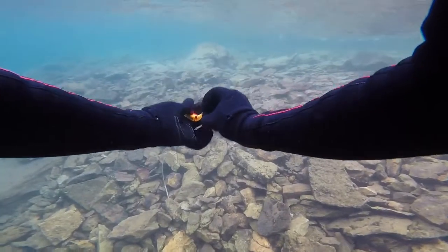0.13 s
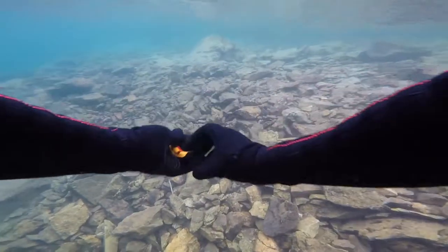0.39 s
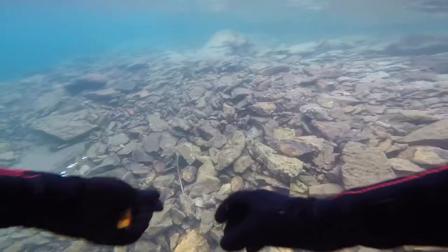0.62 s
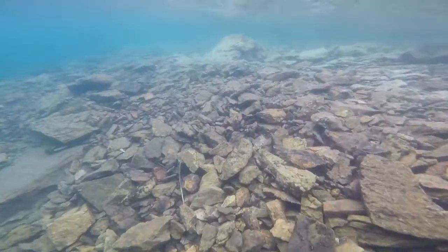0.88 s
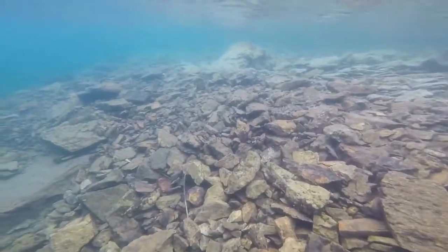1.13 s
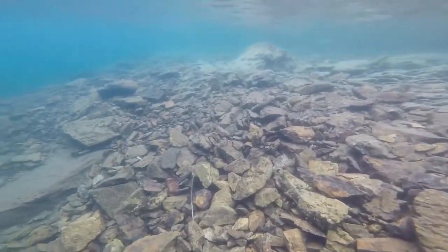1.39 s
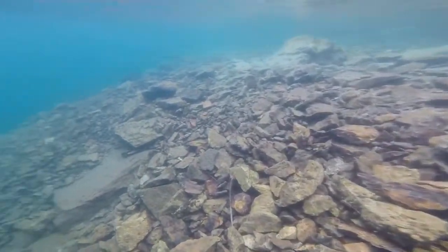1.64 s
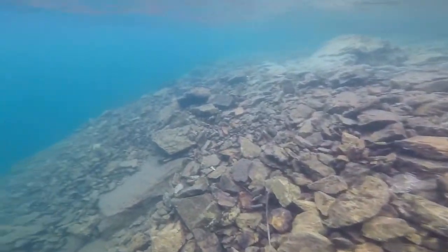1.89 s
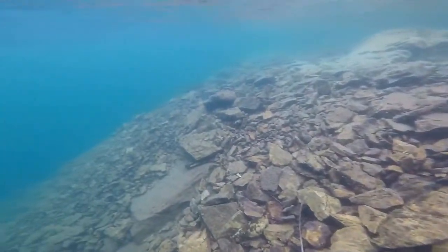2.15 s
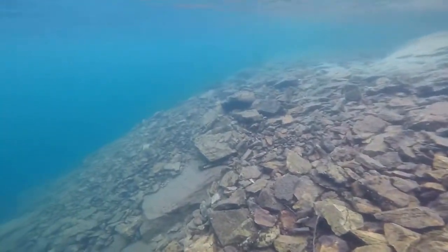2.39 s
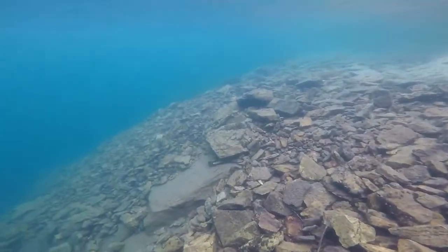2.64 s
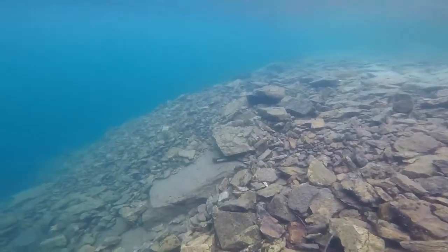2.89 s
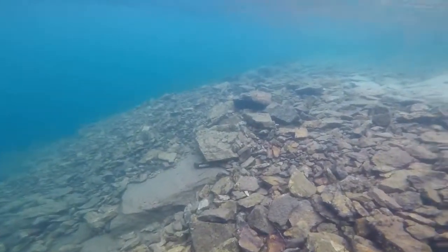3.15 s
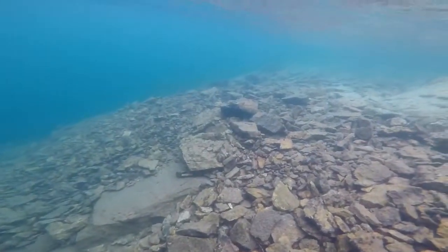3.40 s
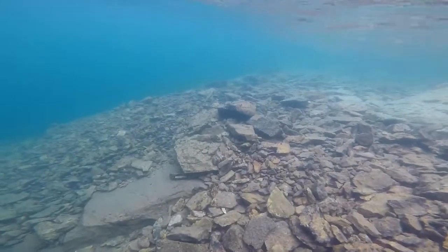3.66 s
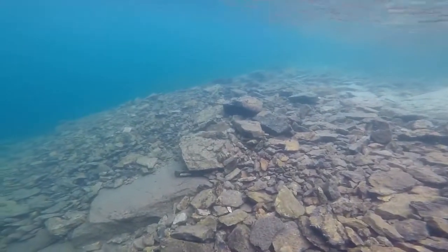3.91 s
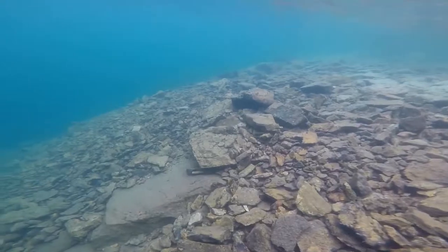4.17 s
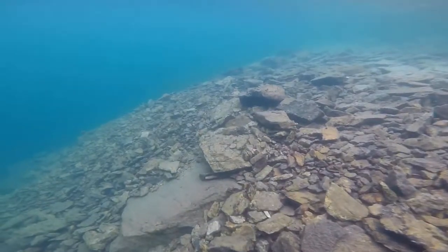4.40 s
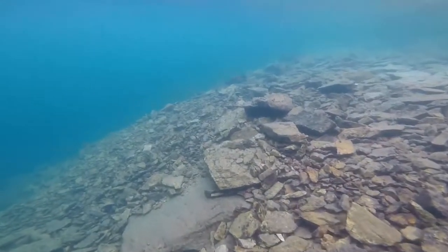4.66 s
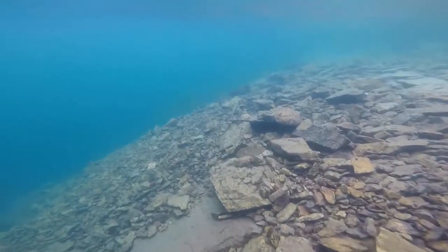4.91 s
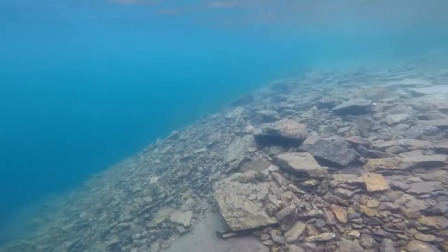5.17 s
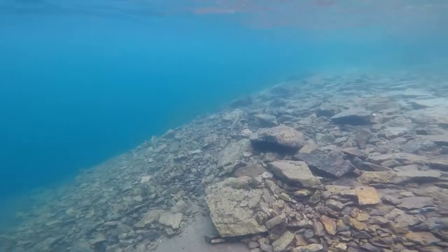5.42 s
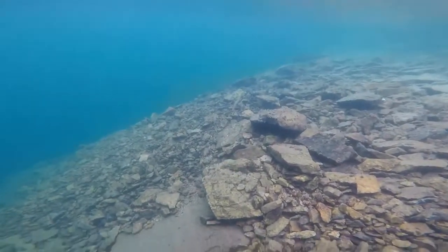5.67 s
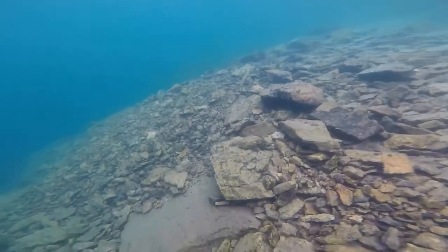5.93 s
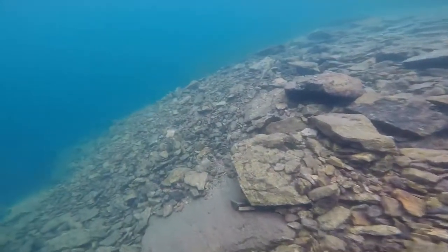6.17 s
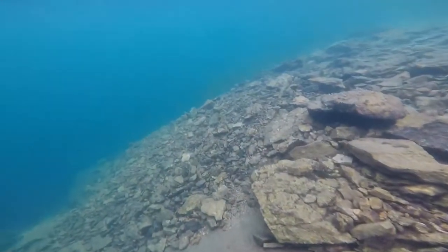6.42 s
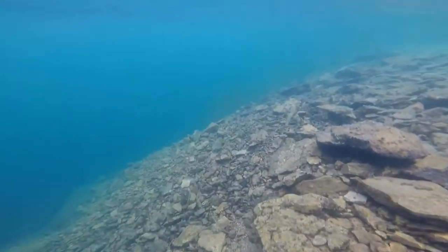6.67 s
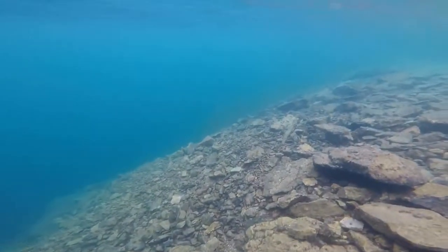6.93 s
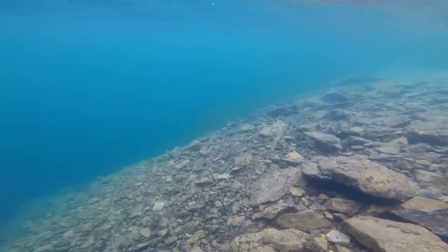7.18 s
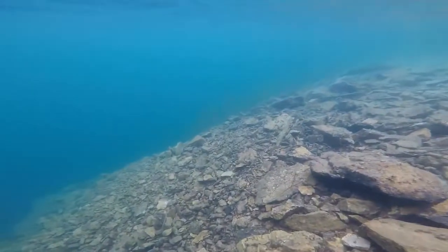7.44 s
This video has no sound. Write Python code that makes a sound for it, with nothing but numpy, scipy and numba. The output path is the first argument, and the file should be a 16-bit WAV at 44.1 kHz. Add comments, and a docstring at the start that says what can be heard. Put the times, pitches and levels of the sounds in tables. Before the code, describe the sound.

Close, muffled water sound from a sealed camera on a swimmer's head, just under a lake's surface. From the start water gurgles and rumbles past with a hollow swish, over soft microphone hiss and a very faint thin whistle gone by 0.5 s. Small bubbles blip and gurgle in a cluster from 0.35 to 1 s, and a low surge peaks about 0.95. Between 1.5 and 2.5 come deep glugs, bright single bloops, a sharper knock near 1.95 and another surge near 2.15. At 2.75 a hard knock meets a splashy rush of bubbles; strong thuds follow around 3.2. From 4.2 to 4.9 knocks and bloops crowd together, the level dipping after the hardest. Gurgling swells around 5.5, with a knock; swish rises near 6, light shell ticks at 5.8 and 6.1, knocks at 6.25 and 6.55. Glugs and bubbles continue to 7.5.

```python
"""Water surges and gurgles past at once, close against a camera sealed in a housing on a swimmer's head,
just under a lake's surface. Bubbles are swelling and dying tones; crowds of them make the streaming water,
swishing through the housing's ring near 1 kHz. Air pockets glug, and knocks of the mount and ticks on the
shell ring fixed modes. Two microphone ports add hissing noise, and a gain control ducks everything,
the hiss too, after the hardest knocks."""
import sys
import numpy as np
from scipy import signal
from scipy.fft import rfft, irfft
from scipy.io import wavfile
from scipy.ndimage import uniform_filter1d, minimum_filter1d
from numba import njit

SR = 44100
rng = np.random.default_rng(int(sys.argv[2]) if len(sys.argv) > 2 else 0)


def invert_db(x):
    """Field ratio 10**(x/20) for x, a level in decibels (scalar or array-like)."""
    u = np.asarray(x, float) / 20
    return 10 ** u


def output_pcm(signal):
    """Save a mono or channel-first signal as 16-bit PCM at the path in sys.argv[1].

    Samples are clipped to [-1, 1] before scaling.
    """
    pcm = np.clip(np.atleast_2d(signal).T, -1, 1) * 32767
    wavfile.write(sys.argv[1], SR, np.round(pcm).astype(np.int16))


N = 333396  # samples


def along_hz(table):
    """Columns of a table spread over the spectrum's bins, straight along log frequency."""
    hz, *columns = np.transpose(table)
    bins = np.log(np.maximum(np.fft.rfftfreq(N, 1 / SR), 1))
    return [np.interp(bins, np.log(hz), column) for column in columns]


def shaped(x, gain):
    """Filter by a gain for each bin."""
    return irfft(rfft(x) * gain, N)


def steps(per_s):
    """Random levels of unit scatter, held briefly and slewed."""
    hold = int(SR / per_s)
    held = np.repeat(rng.standard_normal(int(30 * N / SR)), hold)[:N]
    return uniform_filter1d(held, size=hold // 2)


@njit
def ring(n, rate, at, size, hz, rise, bend, fall):
    """Tones that swell for `rise` seconds to their peak at `at`, then die away, the pitch bending as they go."""
    out = np.zeros(n)
    for k in range(len(at)):
        start, phase = int((at[k] - rise[k]) * rate), 0.
        for i in range(max(0, -start), min(int(11 * rise[k] * rate), n - start)):
            age = i / (rise[k] * rate)  # 1 at the peak
            late = age + (fall - 1) * max(age - 1, 0.)
            # the bend goes from `bend` octaves below the pitch to as far above it
            phase += 2 * np.pi * hz[k] * 2 ** (bend[k] * (min(age, 2.) - 1)) / rate
            out[start + i] += size[k] * late * np.exp(1 - late) * np.sin(phase)
    return out


BIGGEST = 3.5  # largest bubble, in size scatters above the smallest


def cloud(low_hz, high_hz, per_s, cycles, scatter_db, rise_octaves, fall=0.42):
    """Many bubbles of chance time, size and pitch, together at unit loudness."""
    when, pitch, bigness = rng.random((3, int(per_s * N / SR)))
    hz = low_hz * (high_hz / low_hz) ** pitch
    size = invert_db(scatter_db * np.minimum(-np.log(1 - bigness), BIGGEST))
    x = ring(N, 1. * SR, when * N / SR, size, hz, cycles / hz / 2, rise_octaves + 0 * hz, fall)
    return x / np.std(x)


def passing(start_s, stop_s, db, kind):
    """A bubble cloud that fades in fast, holds and fades out more slowly."""
    attack_s, release_s = 0.022, 0.18
    corners_s = [start_s, start_s + attack_s, stop_s, stop_s + release_s]
    return invert_db(db) * np.interp(np.arange(N) / SR, corners_s, [0, 1, 1, 0]) * cloud(*kind)


# The water streaming past the housing, at the near port before flutter and housing tilt. Each row: time in
# seconds, then levels in dB of the surge, the gurgle, the swish and the fizz.
FLOW = [(0, -25, -16, -24, -46), (0.249, -15.5, -20, -25.5, -51.5), (0.598, -19.5, -20, -24, -45),
        (.8, -17, -15, -25, -44), (.96, -10.5, -15, -20.5, -46), (1.1, -17.5, -18, -21.5, -50.5),
        (1.219, -27.5, -23, -27.5, -49.5), (1.36, -24, -21, -25, -50), (1.39, -22, -19.5, -18.5, -44),
        (1.5, -18, -16.5, -21, -45.5), (1.848, -24.5, -19, -19.5, -53), (2.159, -13, -16, -20.5, -49.5),
        (2.502, -34.5, -23.5, -22.5, -48), (2.72, -29, -17.5, -22, -48.5), (2.75, -21, -17.5, -17, -49.5),
        (2.85, -18, -21.5, -16, -44.5), (2.968, -23, -21, -20.5, -44.5), (3.1, -15.5, -17, -17, -47.5),
        (3.237, -19, -18, -16, -44), (3.261, -11.5, -19, -21, -47), (3.361, -20, -17, -20.5, -47.5),
        (3.501, -18.5, -17.5, -20.5, -45.5), (3.65, -17, -23, -14, -45.5),
        (3.849, -23.5, -18.5, -18.5, -41.5), (4.02, -27, -19, -23, -48), (4.19, -15, -24.5, -17, -40),
        (4.22, -21, -20.5, -21.5, -49.5), (4.45, -25, -21.5, -21, -47.5), (4.65, -22.5, -17.5, -19.5, -54),
        (4.8, -16.5, -16.5, -24.5, -48.5), (5.15, -17, -19, -19.5, -43.5), (5.501, -21, -14.5, -20, -45),
        (5.95, -20.5, -19.5, -14.5, -44.5), (6.301, -17, -15, -21, -48.5), (6.55, -25, -22, -23, -51),
        (6.8, -18.5, -17.5, -21.5, -49.5), (7.0, -22, -19, -24, -48), (7.14, -21.5, -18.5, -18.5, -51),
        (7.299, -24.5, -13, -21.5, -46), (7.56, -24.5, -20, -20, -50)]
# Sloshes over a steady lapping. Each row: loudest moment in seconds, level in dB, length in seconds.
SLOSHES = [(0.353, -24.5, 0.045), (0.734, -27.5, 0.14), (1.075, -35, 0.07), (2.087, -28.5, 0.1),
           (2.76, -18.5, 0.035), (2.792, -29.5, 0.013), (2.866, -27, 0.071), (3.068, -27.5, 0.17),
           (3.234, -21, 0.048), (3.513, -30.5, 0.16), (4.202, -19, 0.034), (4.371, -27, 0.026),
           (4.683, -29.5, 0.18), (5.153, -27.5, 0.044), (5.379, -27.5, 0.063), (5.648, -27, 0.15),
           (6.002, -18, 0.064), (6.236, -28.5, 0.09), (6.826, -40.5, 0.23)]
LAPPING_DB = -30
# flutter shared by all clouds, and a wander of each: changes a second, scatter in dB before slewing
FLUTTER_PER_S, FLUTTER_DB = 14, 1.4
WANDER_PER_S, WANDER_DB = 18, [1.5, 1.2, 1.3, 1.5, 1]  # surge, gurgle, slosh, swish, fizz


def cloud_levels():
    """Gain of each cloud: the flow or the sloshes, a wander of its own and a flutter shared by all."""
    t = np.arange(N) / SR
    s, *columns = np.transpose(FLOW)
    surge, gurgle, swish, fizz = (invert_db(np.interp(t, s, column)) for column in columns)
    slosh = invert_db(LAPPING_DB)
    for at, db, length in SLOSHES:
        slosh = slosh + invert_db(db) * np.exp(-((t - at) / length) ** 2)
    shared_db = FLUTTER_DB * steps(FLUTTER_PER_S)
    sources = zip([surge, gurgle, slosh, swish, fizz], WANDER_DB)
    return [gain * invert_db(shared_db + db * steps(WANDER_PER_S)) for gain, db in sources]


# Bubble clouds of the water: surge, gurgle, slosh, swish, fizz. Each row: lowest pitch in Hz, highest in Hz,
# bubbles a second, cycles in twice the swelling time, size scatter in dB, pitch rise up to the peak in octaves.
CLOUDS = [(25.1, 75, 65, 1.58, 0.5, 0.091), (73.9, 267.7, 250, 2.376, 2, 0.18),
          (260.3, 677, 500, 2.93, 4.5, 0.1), (615.8, 1474.6, 850, 8.87, 3.5, 0.094),
          (1280, 3200, 2500, 4, 6, 0.16)]
# Tilt that the sealed housing gives the bubble clouds. Each row: frequency in Hz, gain in dB.
HOUSING = [(12, 6), (24, -9.5), (42, 3), (75, -4), (120, 1.5), (200, 1), (270, -4.5), (320, -6), (400, 0),
           (520, -4), (700, -6.5), (880, 6), (1050, 1), (1250, -4), (1500, -12.5), (1700, 1), (2100, -3.5),
           (2600, -14.5), (3400, -15.5), (4500, -9.5)]
# sparse crackle riding on the fizz: columns as in CLOUDS, and its dB against the fizz
CRACKLE, CRACKLE_DB = (1200, 4000, 350, 4, 3, .03), -6
# pace of dying away against swelling, for each cloud: surge and gurgle drop off fast
CLOUD_FALLS = [2.5, 2.5, 1., 1., 1.]


def water(levels):
    """Five sizes of bubble cloud, a crackle, a cluster and a passing stream, heard through the housing."""
    clouds = sum(gain * cloud(*row, fall) for gain, row, fall in zip(levels, CLOUDS, CLOUD_FALLS))
    clouds = clouds + invert_db(CRACKLE_DB) * levels[-1] * cloud(*CRACKLE)
    clouds = clouds + cluster() + stream()
    return shaped(clouds, invert_db(along_hz(HOUSING)[0]))


# A thin whistle. One row: centre in Hz, half width in Hz, level in dB, fading from and gone at, in seconds.
WHISTLE = (3300, 200, -64, .15, .45)


def whistle():
    """A narrow band of noise, dying out in the first half second."""
    hz, width, db, fading_s, gone_s = WHISTLE
    band = shaped(rng.standard_normal(N), np.exp(-((np.fft.rfftfreq(N, 1 / SR) - hz) / width) ** 2))
    fade = np.interp(np.arange(N) / SR, [fading_s, gone_s], [1, 0])
    return invert_db(db) * band / np.std(band) * fade


# Hiss of the two microphones before its swell. Each row: frequency in Hz, left gain in dB, right gain in dB.
HISS = [(1500, -67, -54.5), (3460, -53.5, -56.5), (4670, -62, -55.5), (6000, -57.5, -58), (9300, -62, -57),
        (10160, -60.5, -58.5), (12500, -70, -67.5), (13670, -83.5, -76)]
# Slow swell of the hiss. Each row: time in seconds, gain in dB.
HISS_SWELL = [(0, 3.5), (0.899, 0.9), (1.5, 2.5), (2.2, 1), (3.5, 0.5), (4.6, 1.4), (5.401, 3.5),
              (5.9, -0.4), (7.56, -0.2)]


def hiss():
    """White noise coloured for each microphone, swelling slowly and flickering alike on both."""
    flicker_db = 1.5 * steps(25)  # 25 changes a second
    swell = invert_db(np.interp(np.arange(N) / SR, *np.transpose(HISS_SWELL)) + flicker_db)
    return swell * np.array([shaped(rng.standard_normal(N), invert_db(db)) for db in along_hz(HISS)])


# Small bubbles heard singly at the near port. Each row: loudest moment in seconds, peak in dB, pitch in Hz.
BLIPS = [(.055, -20.5, 1337), (.056, -40, 2320), (.164, -10, 998), (.325, -28, 1420), (.358, -22, 495),
         (.394, -16, 764), (.411, -32, 1744), (.467, -24.5, 1366), (.47, -21, 605), (.535, -14.5, 1043),
         (.553, -47, 2300), (.568, -15.5, 940), (.582, -38, 2090), (.589, -18, 1390), (.621, -10.5, 1220),
         (.632, -39, 2220), (.693, -41, 1676), (.739, -14.5, 1090), (.806, -21, 1386), (.811, -36, 1900),
         (.846, -36, 2080), (.895, -13, 1124), (.957, -40, 1740), (.986, -16, 1120), (1.02, -9.5, 785),
         (1.028, -44, 2090), (1.097, -20, 596), (.81, -40.5, 2400), (.836, -14.5, 1257), (.855, -7.5, 935),
         (.915, -34, 1880), (.92, -21.5, 1194), (.96, -14, 1157), (.979, -42, 3220), (1.01, -44.5, 2430),
         (1.622, -15, 875), (1.657, -11, 1020), (1.748, -7, 984), (2.152, -8, 790), (1.955, -2, 1084),
         (2.384, -3.5, 910), (2.622, -46, 2870), (2.758, -12.5, 534), (2.876, -15, 1290), (4.06, -10, 1126),
         (4.119, -20, 1336), (4.19, -11.5, 797), (4.199, -6, 416), (4.247, -13.5, 1075), (4.6, -10, 1027),
         (4.293, -7, 922), (4.363, -12.5, 398), (4.666, -2, 913), (4.736, -19, 439), (4.886, -15.5, 615),
         (5.336, -21.5, 466), (5.56, -44.5, 3230), (5.638, -44, 3340), (5.644, -27, 1500),
         (5.683, -17.5, 1270), (5.954, -15, 680), (6.763, -9.5, 970), (6.829, -13.5, 828),
         (6.83, -20.5, 1230), (7.015, -12.5, 910), (7.131, -14.5, 1007), (7.392, -15, 805),
         (7.43, -11, 1094), (7.233, -26.5, 1600), (7.299, -12, 1275), (7.355, -22, 1406)]


def blips():
    """Small bubbles that all swell for the same number of cycles and die away at a slower pace."""
    s, db, hz = np.transpose(BLIPS)
    cycles_to_peak, rise_octaves, fall = 3.277, 0.029, 0.75
    return ring(N, 1. * SR, s, invert_db(db), hz, cycles_to_peak / hz, rise_octaves + 0 * s, fall)


# Large air pockets. Each row: loudest moment in seconds, peak in dB, pitch in Hz, length in ms.
GLUGS = [(0.371, -11, 46.3, 54), (0.784, -3, 221.7, 18), (1.134, -5, 157.3, 14), (1.515, -8.5, 115, 29.7),
         (1.843, -5, 109.6, 14), (1.881, -1, 123.8, 14), (2.12, -10.5, 127.3, 40), (2.338, -5, 139, 29),
         (2.489, -10.5, 57.2, 16), (2.74, -6.5, 71, 39), (2.901, -16.5, 265.4, 38), (3.244, -1.5, 56.4, 16),
         (3.411, -4.5, 111, 18.7), (4.411, -6, 130.4, 70), (4.529, -16, 145.2, 98), (4.876, -11, 144.2, 94),
         (5.492, -11.5, 101.8, 144.2), (5.556, -17.5, 112, 153), (5.787, -3.5, 107, 28.5),
         (6.452, -12, 227, 26), (6.808, -10.5, 100.2, 113), (6.868, -7, 151, 31), (7.205, -4.5, 120, 27.5)]


def glugs():
    """Air pockets as low tones of their own lengths, rising slightly in pitch."""
    s, db, hz, ms = np.transpose(GLUGS)
    swell_share, rise_octaves = 0.4047, 0.044  # share of the length spent swelling
    return ring(N, 1. * SR, s, invert_db(db), hz, swell_share * ms / 1000, rise_octaves + 0 * s, 1.)


def cluster():
    """A cluster of uneven bubbles gurgling up early on."""
    return passing(.35, 0.94, -40, (700, 2400, 240, 5, 4, 0.13))  # kind: columns as in CLOUDS


# What the mount rings with. Each row: frequency in Hz, level in dB, t60 in seconds.
MOUNT = [(290, 0.5, .04), (490, -1.5, .035), (700, -6, .03), (1100, -5, .018), (1600, -35, .015),
         (2000, -38, .014)]
# Knocks of the mount. Each row: start in seconds, level in dB, sharpness in dB per octave around 500 Hz,
# low modes at the right port against the left in dB.
KNOCKS = [(.352, -8, -2, 0), (1.077, -9, 0, 0), (1.375, -12, 3, 0), (1.634, -8, -4, 0), (1.732, -9, -4, 0),
          (1.952, -9, 7, 5), (2.733, -10, -4, 0), (2.746, -3, 2, 4), (3.207, -9, 1, 0), (3.229, 0, 1, 5),
          (3.318, -3, -9, 0), (3.744, -7, -5, 0), (3.857, -6, -6, 0), (4.188, -5, 1, 0),
          (4.229, 1, -3, -10), (4.406, -7, 2, -10), (4.564, -7, 0, -6), (4.645, -6, 1, -11),
          (4.812, -3, 1, -10), (4.905, -6, 3, -10), (5.574, -5, 4, 5), (6.228, -11, 2, 0),
          (6.259, -3, -7, 0), (6.548, -8, -3, 0)]
LOW_MODE_HZ = 600  # modes below it differ between the ports


def knocks():
    """Every knock rings the same modes; a sharper contact favours the high ones. Left and right."""
    out = np.zeros((2, N + SR))
    t = np.arange(SR // 10) / SR
    for s, db, sharp_db, right_db in KNOCKS:
        start = int(s * SR)
        for hz, mode_db, t60 in MOUNT:
            ports_db = np.array([[0], [right_db * (hz < LOW_MODE_HZ)]])
            size = invert_db(db + mode_db + sharp_db * np.log2(hz / 500) + ports_db)
            tone = np.sin(2 * np.pi * hz * (1 + .03 * rng.standard_normal()) * t)
            contact = (1 - np.exp(-2.5 * t * hz)) ** 3  # soft onset
            out[:, start:start + len(t)] += size * tone * contact * np.exp(-np.log(1000) * t / t60)
    return out[:, :N]


# What the housing's shell rings with when ticked. Each row: frequency in Hz, level in dB, t60 in seconds.
SHELL = [(1650, -2, .012), (2050, 3, .012), (2500, 1, .01), (3200, -3, .008), (3750, 0, .007),
         (4600, -3, .005), (5600, -3, .004), (7200, -1, .003), (9000, 0, .003), (11000, 0, .003)]
# Light hard ticks on the shell. Each row: start in seconds, level in dB, strongest near this Hz,
# falling off from there in dB per octave, right port against left in dB.
TICKS = [(.470, -44, 4600, 7, 0), (1.377, -54, 5600, 12, 3), (1.396, -51, 4200, 14, 6),
         (1.952, -33, 4200, 3, -22), (2.235, -47, 3400, 20, -2), (2.825, -55, 9000, 9, 20),
         (2.965, -34, 3000, 17, -3), (3.744, -35, 3500, 22, -3), (4.178, -56, 5600, 5, 3),
         (4.707, -62, 11000, 14, 20), (5.827, -28, 2350, 15, -1), (6.138, -23, 1900, 36, 1),
         (6.139, -32, 3750, 15, -2), (6.381, -56, 5800, 14, 9), (7.401, -45, 3200, 22, -2)]


def ticks():
    """A tick rings the shell's modes near its own pitch. Left and right."""
    out = np.zeros((2, N))
    t = np.arange(SR // 50) / SR
    hz, mode_db, t60 = np.transpose(SHELL)[:, :, None]
    for s, db, centre_hz, fall_db, right_db in TICKS:
        start = int(s * SR)
        size = invert_db(db + mode_db - fall_db * np.abs(np.log2(hz / centre_hz)))
        tone = np.sin(2 * np.pi * hz * (1 + .03 * rng.standard_normal(hz.shape)) * t)
        contact = (1 - np.exp(-t * hz)) ** 2
        ringing = np.sum(size * tone * contact * np.exp(-np.log(1000) * t / t60), axis=0)
        out[:, start:start + len(t)] += invert_db(np.array([[0], [right_db]])) * ringing
    return out


def stream():
    """A stream of like-sized bubbles rushing past."""
    return passing(2.77, 3.01, -20, (1200, 1420, 480, 12, 3.3, 0.078))  # kind: columns as in CLOUDS


# Right port against left. Each row: frequency in Hz, level in dB, phase lead in radians,
# share of the water heard by both ports from 0 to 1.
PORTS = [(30, 0, -.1, .8), (60, 0, -.2, .72), (110, -1.2, -.15, .92), (200, -4, .1, .85),
         (300, -3, 1.8, .4), (400, -2.2, 2.6, .6), (520, 3, 3.5, .6), (650, 1.5, 3.75, .92),
         (900, -2.4, 3.1, .98), (1400, -1.2, 2.2, .94), (2500, -.6, 1.3, .7), (3200, -2.5, -.1, .7)]


def scene():
    """The right port hears the housing's ring nearly upside down, and some eddies of its own."""
    level_db, lead, share = along_hz(PORTS)
    share = np.clip(share, 0, 1)
    levels = cloud_levels()
    near, own = water(levels), water(levels)
    events = blips() + glugs() + knocks() + ticks() + whistle()
    right = rfft(events[1]) + share * rfft(near) + np.sqrt(1 - share ** 2) * rfft(own)
    return np.array([near + events[0], irfft(right * invert_db(level_db) * np.exp(1j * lead), N)])


@njit
def ducking(peak, top, depth, quick, slow, share):
    """Gain drops for a peak over the top and comes back in a quick and a slow stage."""
    gain, fast_drop, slow_drop = np.ones(len(peak)), 0., 0.
    for i in range(len(peak)):
        over = depth * max(np.log(max(peak[i], 1e-9) / top), 0.)
        fast_drop = max(over, fast_drop * quick)
        slow_drop = max(share * over, slow_drop * slow)
        gain[i] = np.exp(-max(fast_drop, slow_drop))
    return gain


def high_pass(x, hz):
    """First-order cut of the bass below hz."""
    return signal.sosfilt(signal.butter(1, hz, "high", fs=SR, output="sos"), x)


def gain_control(x):
    """A late ducking shared by both sides and nearly deaf to the rumble."""
    threshold_db, depth = -1.2, 5.5  # depth: dB of ducking per dB over
    lag_s, quick_s, slow_s, slow_share = .004, .07, .7, .25  # share of the drop left to the slow recovery
    heard = high_pass(x, 350)
    # each peak is held for about 30 ms
    held = -minimum_filter1d(-np.abs(heard).max(axis=0), size=1301, origin=650)
    quick, slow = np.exp(-1 / (quick_s * SR)), np.exp(-1 / (slow_s * SR))
    gain = ducking(held, invert_db(threshold_db), depth, quick, slow, slow_share)
    smooth = uniform_filter1d(uniform_filter1d(gain, size=120), size=120)
    return x * np.roll(smooth, int(lag_s * SR))


def limiter(x):
    """Looks ahead and turns down smoothly around each peak over the ceiling."""
    ceiling = .95
    room = minimum_filter1d(np.minimum(ceiling / (np.abs(x).max(axis=0) + 1e-9), 1), size=401)
    return x * uniform_filter1d(uniform_filter1d(room, size=200), size=200)


def low_pass(x):
    """Removes everything above the highest recorded frequency."""
    return signal.sosfilt(signal.butter(12, 13000, fs=SR, output="sos"), x)


def record(dry):
    """The microphones add their hiss; a bass cut, the gain control and a limiter follow."""
    x = high_pass(dry + hiss(), 10)
    mix = limiter(gain_control(x))
    return low_pass(mix)


dry = scene()
out = record(dry)
output_pcm(out)
```